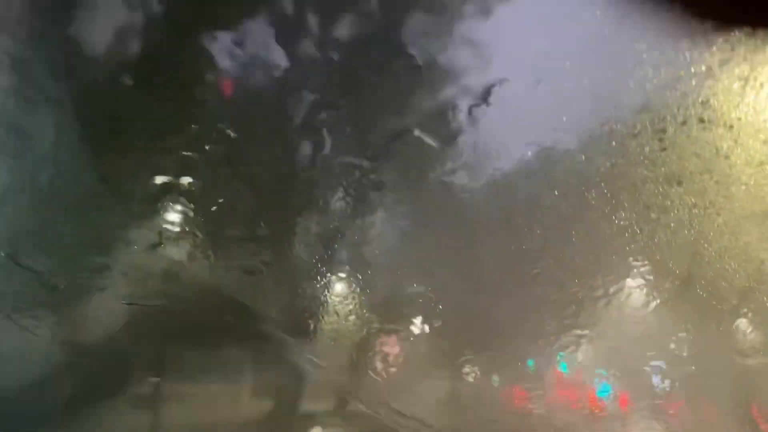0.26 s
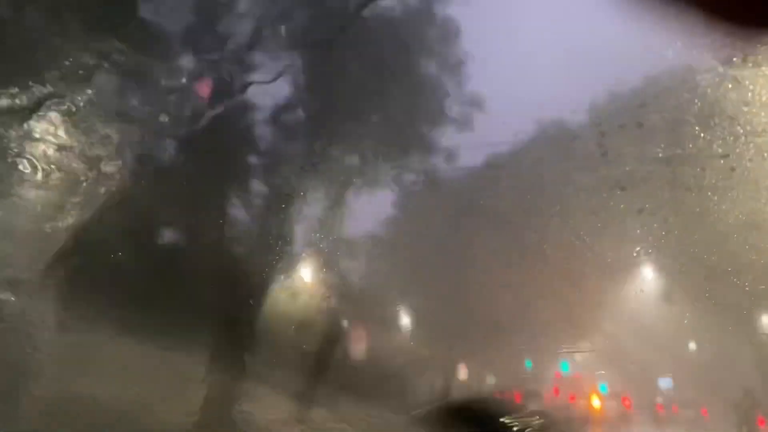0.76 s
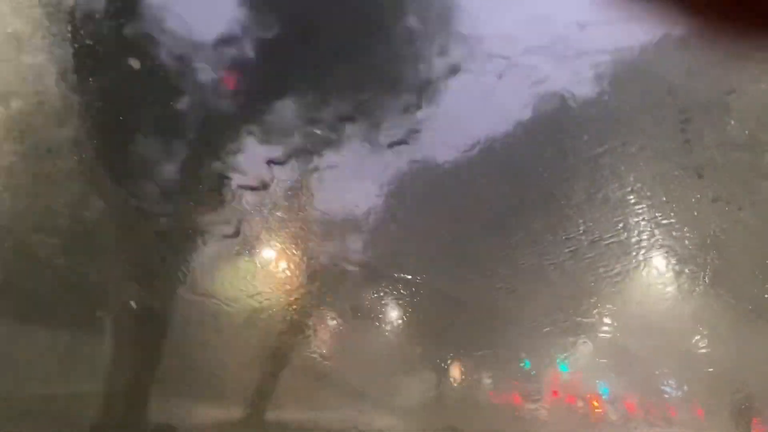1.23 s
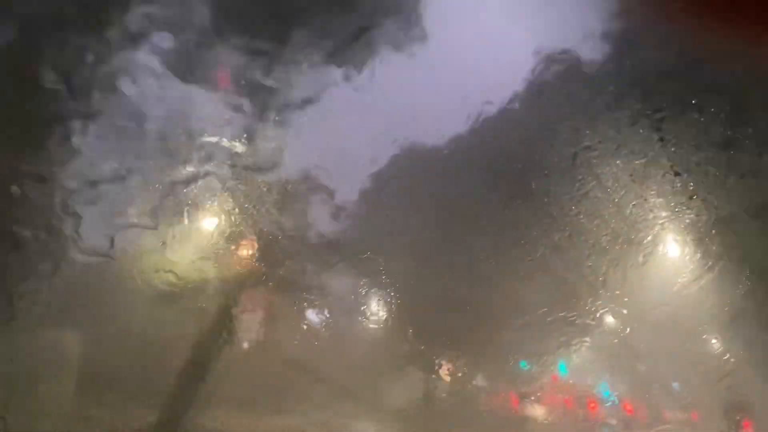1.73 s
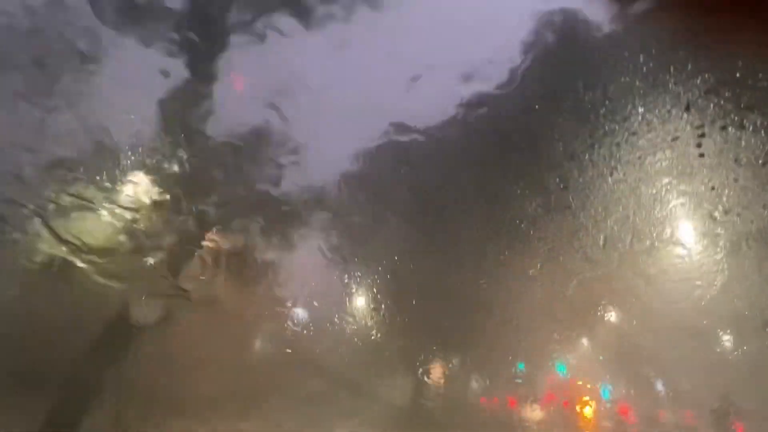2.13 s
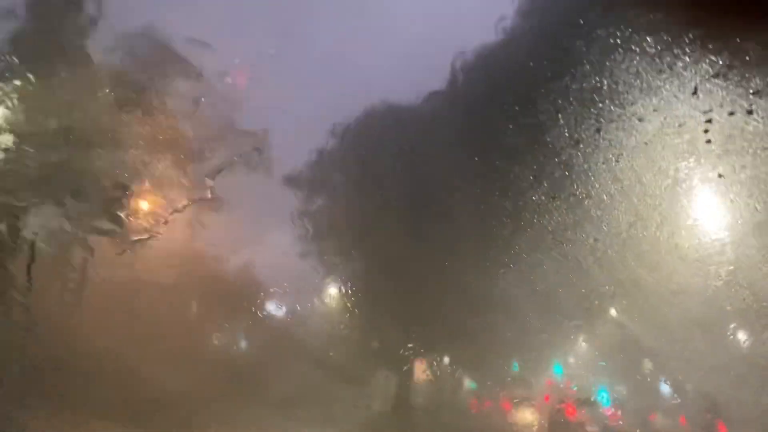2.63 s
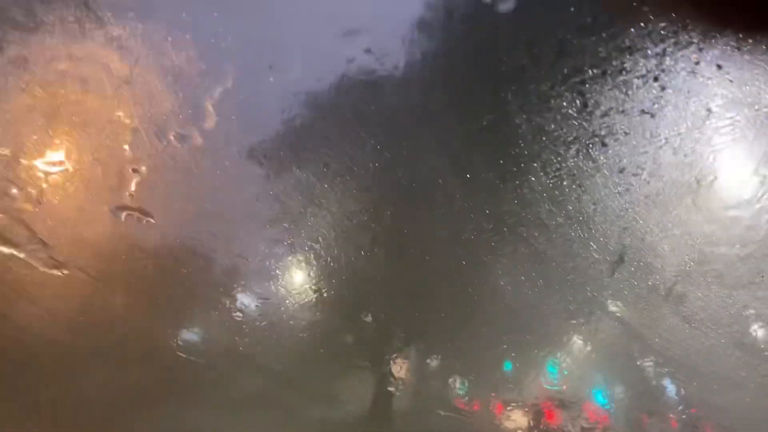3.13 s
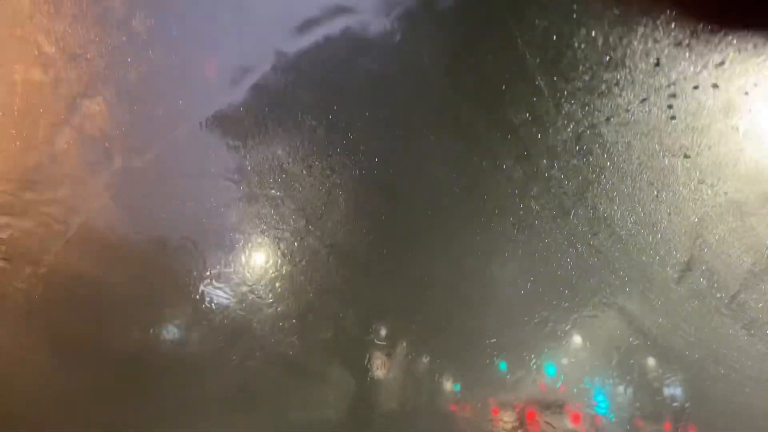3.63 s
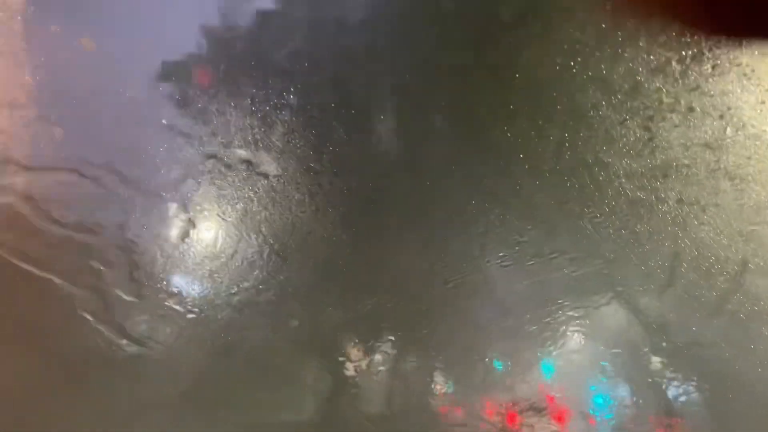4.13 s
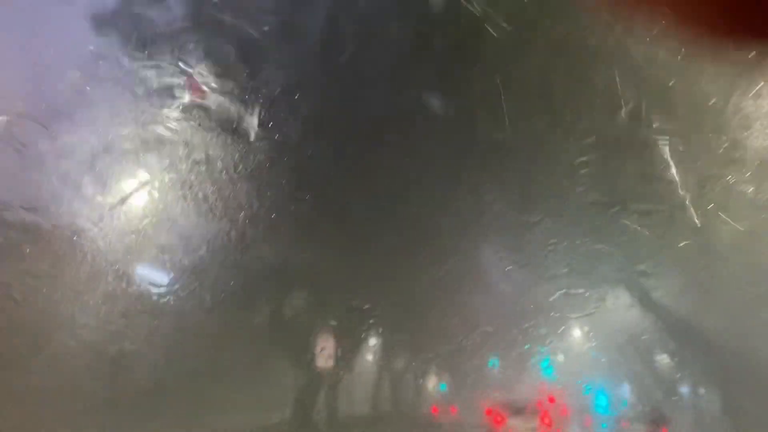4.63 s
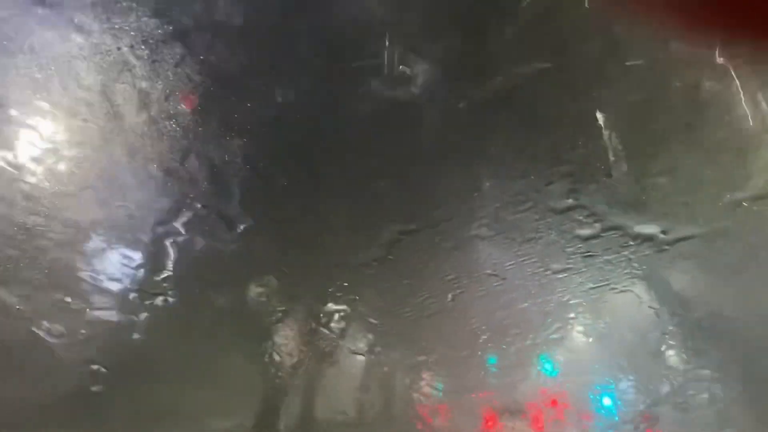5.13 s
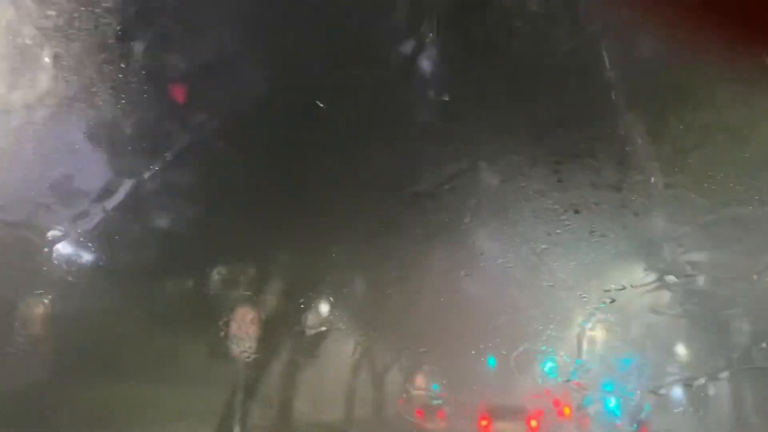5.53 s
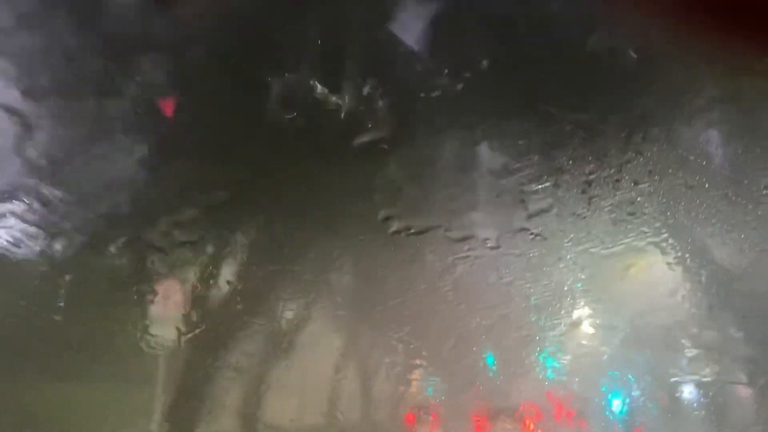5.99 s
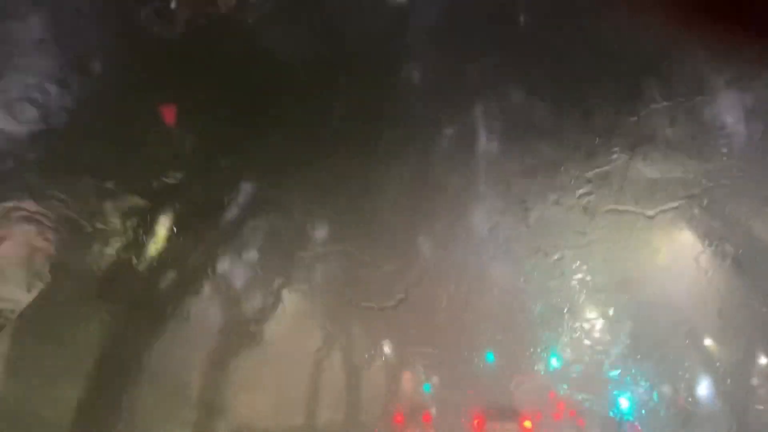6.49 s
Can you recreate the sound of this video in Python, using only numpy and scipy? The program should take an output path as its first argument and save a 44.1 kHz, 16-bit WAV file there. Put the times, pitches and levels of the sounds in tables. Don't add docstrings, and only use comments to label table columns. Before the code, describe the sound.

Rain gusts strongest in the first half second, then eases to a steady wash with scattered sharp splats. Big drops cluster early, thin out in the middle and return near five seconds. Wiper reversals beat regularly underneath, low bump then harder double thud. A low engine hum rises briefly, falls away, then lifts slightly near the end. Enclosed car cabin, wide stereo, microphone near the wet windshield.

```python
import sys
import numpy as np
from scipy import signal
from scipy.fft import rfft, irfft, next_fast_len
from scipy.io import wavfile
from scipy.ndimage import uniform_filter1d, map_coordinates

SR = 44100
rng = np.random.default_rng(int(sys.argv[2]) if len(sys.argv) > 2 else 0)


def wrap_up_sound(samples):
    columns = np.atleast_2d(samples).T
    tamed = np.clip(columns, -1, 1)
    steps = np.round(tamed * 32767).astype(np.int16)
    wavfile.write(sys.argv[1], SR, steps)


def volts(x):
    e = np.asarray(x, float) / 20
    return 10 ** e


N = 297802


def unit(x):
    return x / np.sqrt(np.mean(x ** 2) + 1e-20)


def along(points, hz):
    f, v = np.transpose(points)
    return np.interp(np.log(hz + 1), np.log(f + 1), v)


def curves(rows):
    s, *cols = np.transpose(rows)
    return [np.interp(np.arange(N) / SR, s, c) for c in cols]


def wobble(rate):
    knots = rng.standard_normal(int(N * 60 / SR) + 4)
    return map_coordinates(knots, [np.arange(N) * min(rate, 60) / SR])


def filtered(x, response):
    m = next_fast_len(x.shape[-1] + 2048)
    spectrum = rfft(x, m) * response(np.fft.rfftfreq(m, 1 / SR))
    return irfft(spectrum, m)[..., :x.shape[-1]]


# pitch_hz, likeness (1 = same)
LIKENESS = [(60, 1), (150, 0.94), (250, 0.8), (500, 0.5), (1200, 0.2), (3000, 0.35), (5500, 0.3),
            (7000, 0.45), (8300, 1), (15000, 1)]


def paired(hz):
    turn = np.arccos(np.clip(along(LIKENESS, hz), -1, 1)) / 2
    return np.array([np.cos(turn), np.sin(turn)])


def rush(spectrum, patchy_db):
    z = signal.stft(rng.standard_normal((2, N)), nperseg=256)[2]
    patches = uniform_filter1d(rng.standard_normal(z.shape[1:]), size=8, axis=0)
    patches = unit(uniform_filter1d(patches, size=8, axis=1))
    pair = signal.istft(z * volts(patchy_db * patches), nperseg=256)[1][:, :N]
    mid, side = filtered(pair, lambda hz: volts(along(spectrum, hz)) * paired(hz))
    return unit(np.array([mid + side, mid - side]))


# pitch_hz, level_db (per Hz)
SPRAY = [(4000, -24), (6500, -3.5), (9500, -0.5), (11000, -6), (12300, -16), (13100, -32), (14200, -26),
         (15600, -40)]


def splats(s, db, ring_hz, click_db, pan_db, t60):
    t = np.arange(768) / SR
    noise = rng.standard_normal((len(s), 2, 2, len(t)))
    noise[..., 0] += 6
    c = ring_hz[:, None, None]

    def panel(f):
        resonance = 1j * f * .9 * c / (c * c - f * f + 1j * f * 1.48 * c)
        return resonance / (1 + 1j * f / 7000) ** 2 / (1 + (f / 11000) ** 8)

    def bending(f):
        return np.exp(-1j * 25 * (np.sqrt(f / 1000) - f / 5000))

    def peak(x):
        return x / np.abs(x).max(axis=(1, 2), keepdims=True)

    ring = filtered(noise[:, 0] * volts(-60 * t / t60), lambda f: panel(f) * bending(f) * paired(f))
    click = filtered(noise[:, 1] * volts(-60 * t / 0.024), lambda f: volts(along(SPRAY, f)) * paired(f))
    drop = peak(ring) + volts(click_db)[:, None, None] * peak(click)
    drop = volts(db)[:, None, None] * drop
    at = (np.round(s * SR).astype(int)[:, None] + np.arange(len(t))).ravel()
    ports = [volts(k * pan_db / 2)[:, None] * (drop[:, 0] + k * drop[:, 1]) for k in (1, -1)]
    return np.array([np.bincount(at, p.ravel(), N + len(t))[:N] for p in ports])


# start_s, level_db
SHOWER = [(0, -31.5), (.06, -27), (.44, -25.5), (.57, -31.5), (1.28, -34.5), (1.36, -33.5), (2.05, -31.5),
          (2.68, -33), (2.9, -37.5), (3.22, -36.5), (3.33, -31.5), (4.5, -32), (4.95, -30.5), (5.27, -29),
          (5.36, -32.5), (5.8, -31), (6.32, -33.5), (6.55, -29.5)]
# pitch_hz, level_db (per Hz)
PATTER = [(250, -30), (500, 0), (800, 2), (1300, 2), (2000, -1), (3200, -2.5), (4500, -8.5), (6200, -15),
          (9000, -35)]
# pitch_hz, level_db (per Hz)
ROOF = [(100, -28), (180, -2), (300, -3.5), (450, -8), (700, -55)]
SPRAY_DB, SPRAY_GROWS = -11, 0.84
ROOF_DB, ROOF_GROWS = -32.5, 0.45


def rain_wash():
    patter_db, = curves(SHOWER)
    mean_db = patter_db.mean()
    swell_db = patter_db - mean_db
    gust_db = 0.5 * wobble(13) + 0.3 * wobble(25)
    spray_db = mean_db + SPRAY_DB + SPRAY_GROWS * swell_db + gust_db + 0.64 * wobble(5)
    roof_db = ROOF_DB + ROOF_GROWS * swell_db + 0.84 * wobble(12)
    wash = volts(patter_db + gust_db + 2.8) * rush(PATTER, patchy_db=2.0)
    wash += volts(spray_db) * rush(SPRAY, patchy_db=2.0)
    return wash + volts(roof_db) * rush(ROOF, patchy_db=2.5)


def near_drops():
    patter_db, = curves(SHOWER)
    luck = rng.random((1500, 5))
    s = luck[:, 0] * (N - 1) / SR
    size_db = patter_db[(s * SR).astype(int)] - 3.5 - 3.8 * np.log(luck[:, 1] + 0.017)
    ring_hz = 1200 * 3.5 ** luck[:, 2]
    click_db = -22 + 16 * luck[:, 3]
    pan_db = 8 * (luck[:, 4] - .5)
    return splats(s, size_db, ring_hz, click_db, pan_db, t60=0.014)


# start_s, firing_hz, load_db
ENGINE = [(0, 39.1, -22), (.15, 38.65, -17), (1.31, 38.6, -25), (2.16, 37.71, -24), (2.45, 37.6, -25),
          (2.57, 35.96, -18), (2.73, 39, -18.5), (2.82, 41.02, -16.5), (2.93, 30.62, -26.5),
          (3.44, 29.84, -21), (3.93, 25.99, -25), (4.25, 25.14, -26.5), (5.0, 24.01, -24.5),
          (6.0, 23.6, -25), (6.15, 30.34, -23), (6.26, 33.71, -20), (6.45, 30.2, -21), (6.75, 30.37, -20.5)]
# pitch_hz, level_db
CABIN = [(20, -22), (30, -5), (38, 0), (52, -1.5), (77, -7), (98, 0.5), (118, -4.5), (150, -1), (172, -11),
         (200, -27), (300, -24.5)]
DECLUTCH_S, DECLUTCH_DB = 2.56, -7


def engine():
    firing_hz, load_db = curves(ENGINE)
    turn = 2 * np.pi * np.cumsum(firing_hz) / SR
    loose_db = DECLUTCH_DB * np.clip((np.arange(N) / SR - DECLUTCH_S) / .08, 0, 1)
    drone = np.zeros(N)
    for k in range(1, 9):
        order_db = load_db + 2.5 + along(CABIN, k * firing_hz) + 1.2 * wobble(7)
        if k == 1:
            order_db = order_db + loose_db
        drone += volts(order_db) * np.cos(k * turn + 0.17 * k * wobble(6))
    return filtered(drone, lambda hz: [1 + .12j * hz / 150, 1 - .12j * hz / 150])


# pitch_hz, level_db (per Hz)
ROAD = [(15, -40), (28, -9), (40, 3), (60, 8.5), (100, 2), (150, -2.5), (190, -19), (300, -50)]
ROAD_DB, ROAD_DB_PER_HZ = -23.5, 0.4


def road_rumble():
    firing_hz = curves(ENGINE)[0]
    road_db = ROAD_DB + ROAD_DB_PER_HZ * (firing_hz - firing_hz.mean())
    return volts(road_db + 1.9 * wobble(8.0)) * rush(ROAD, patchy_db=2.66)


# start_s, peak_db, ring_hz
SPATTER = [(0.0952, -15, 1770), (0.2448, -11, 1540), (0.2843, -18, 3000), (0.4195, -11, 1430),
           (0.5924, -13.5, 1610), (0.7881, -16, 1520), (0.8044, -16.5, 2740), (1.0377, -15.5, 1420),
           (1.3012, -17, 1540), (1.5793, -24, 1830), (1.7928, -24, 1300), (2.1077, -15.5, 1530),
           (2.1885, -19, 2930), (2.2542, -14, 2960), (2.295, -14.5, 2820), (2.6744, -15.5, 1525),
           (2.809, -17, 1440), (3.2813, -23, 1520), (5.0686, -18, 1720), (5.1218, -11.5, 1497),
           (5.235, -12, 1392), (5.5373, -13.5, 1350), (5.679, -20, 1344), (5.737, -23, 2780),
           (5.9229, -16, 1632), (6.0372, -16, 1750), (6.1, -18, 1392), (6.4138, -15, 2687),
           (6.5946, -24, 3130), (6.6328, -17, 1731)]


def roof_edge_drops():
    s, size_db, ring_hz = np.transpose(SPATTER)
    return splats(s, size_db - 3.0, ring_hz, 0 * s - 18, 0 * s + 1.3, t60=0.043)


# start_s, peak_db
TICKS = [(0.1351, -26), (0.1815, -29), (0.2838, -22), (0.307, -23), (0.4759, -22), (0.5157, -22),
         (0.5931, -30), (0.6674, -27), (0.9024, -26), (1.0078, -20.5), (1.1004, -27), (1.3414, -25),
         (1.6741, -28), (1.8067, -33), (1.896, -43), (1.9933, -24), (2.038, -28), (2.1896, -27),
         (2.5464, -31), (2.674, -28), (3.9044, -26), (4.8953, -36), (4.9333, -26), (5.2793, -30),
         (5.3842, -25), (5.875, -33), (6.473, -28), (6.5927, -38), (6.6279, -26)]


def glass_ticks():
    s, tick_db = np.transpose(TICKS)
    return splats(s, tick_db, 0 * s + 5000, 0 * s + 7, 0 * s, t60=0.012)


def thuds(events, modes, swing_s, rise_s, tick_db):
    t = np.arange(SR // 3) / SR
    rise = (1 - np.exp(-t / rise_s)) ** 2

    def rubber(f):
        resonance = 1j * f * 1500 / (1200 ** 2 - f * f + 1j * f * 1500)
        return resonance / (1 + 1j * f / 5000) ** 2

    out = np.zeros((2, N + SR))
    for s, db in events:
        ring = np.zeros((2, len(t)))
        for hz, left_db, right_db, t60 in modes:
            mode_db = np.array([[left_db], [right_db]]) + rng.normal(0, 1.0) - 60 * t / t60
            ring += volts(mode_db) * np.cos(2 * np.pi * hz * (t - swing_s))
        tick = filtered(rng.standard_normal((2, len(t))) * rise * volts(-60 * t / 0.058), rubber)
        start = round((s - .002) * SR)
        out[:, start:][:, :len(t)] += volts(db) * (1.21 * rise * ring + volts(tick_db) * tick)
    return out[:, :N]


# start_s, level_db
SWING = [
    (.14, -33),
    (1.13, -11),
    (2.11, -10.5),
    (3.11, -9),
    (4.1, -10),
    (5.08, -14),
    (6.08, -8),
]
# pitch_hz, left_db, right_db, t60_s
PILLAR = [(62, 4, 1, 0.19), (97, -7.5, -8.5, 0.33), (260, -27, -33, .08)]


def pillar_thuds():
    return thuds(SWING, PILLAR, swing_s=0.0107, rise_s=0.0053, tick_db=-14)


# start_s, peak_db, ring_hz, pan_db
DROPS = [(0.1805, -7, 2770, -1), (0.308, -13, 1520, -2), (0.3409, -11.5, 1520, 7), (0.5155, -25, 1230, -5),
         (0.6723, -11, 3040, 0), (0.9007, -18.5, 1490, 6), (0.931, -14, 1600, 4), (1.0079, -16, 2310, -5),
         (1.05, -12, 1390, -2), (1.1007, -16, 2900, -3), (1.2082, -16, 1940, -1), (1.5184, -18.5, 1590, 1),
         (1.7515, -16.5, 3230, 2.5), (1.8879, -12, 1300, -1), (1.9919, -12.5, 3795, -5),
         (2.0393, -9.5, 1830, -3), (2.155, -18, 1310, -4), (2.5467, -14, 2563, 2), (2.6345, -13, 2210, -2),
         (2.7384, -13, 1390, 3), (4.8766, -15.5, 2730, -3), (4.8937, -9, 1875, 1), (4.978, -13, 1670, 0),
         (5.3837, -19, 1646, 3.0), (5.6969, -14.5, 2053, 3), (5.8023, -10.5, 1380, -3),
         (5.875, -12.5, 1587, -2), (6.4729, -12.5, 2420, -1), (6.6628, -13.5, 1778, 0),
         (6.7063, -14, 1380, -6)]


def big_drops():
    s, db, ring_hz, pan_db = np.transpose(DROPS)
    click_db = 0 * s - 20
    return splats(s, db - 1.5, ring_hz, click_db, pan_db + 0.5, t60=0.053)


# start_s, level_db
PARK = [
    (.618, -6.5),
    (1.606, -5),
    (2.5921, -5.5),
    (3.5831, -6),
    (4.5633, -6.5),
    (5.553, -6.5),
    (6.5413, -8),
]
# pitch_hz, left_db, right_db, t60_s
COWL = [(87.9, -15, -11, 0.39), (132.5, 2, 2.5, 0.1), (182.8, -12.5, -2.5, 0.084), (250, -2, -19.5, 0.093),
        (316, -14, -15, .15), (399, -15.5, -18.5, 0.16), (553, -14, -23, 0.12)]
# pitch_hz, left_db, right_db, t60_s
SECOND_BLADE = [(152, 4, 5.5, 0.061), (92, 1, -10, 0.046), (252, -19, -14, 0.078)]
SNAP_LEAD_S, SNAP_DB, SNAP_HZ = 0.00154, -8, 2800


def cowl_thuds():
    thud = thuds(PARK, COWL, swing_s=.0105, rise_s=0.0029, tick_db=5)
    second = np.add(PARK, [.026, 0])
    thud += thuds(second, SECOND_BLADE, swing_s=0.0057, rise_s=0.0044, tick_db=-12)
    s, db = np.transpose(PARK)
    snap = splats(s - SNAP_LEAD_S, db + SNAP_DB, 0 * s + SNAP_HZ, 0 * s - 30, 0 * s, t60=0.0065)
    return thud + snap


def scene():
    rain = rain_wash() + near_drops() + roof_edge_drops() + glass_ticks() + big_drops()
    wipers = pillar_thuds() + cowl_thuds()
    return rain + engine() + road_rumble() + wipers


def band_limit(x):
    return signal.sosfilt(signal.butter(12, 15750, fs=SR, output="sos"), x)


# pitch_hz, left_minus_right_db
LEAN = [(60, -1), (110, -1), (200, -2), (380, 0.0), (700, 0.5), (1290, 0), (2380, 2), (4400, 3),
        (8120, 1.5), (15000, -2)]
# pitch_hz, left_lead_rad
SKEW = [(150, -0.02), (340, -.3), (600, -1.4), (1200, -1.36), (2500, -0.31)]
PORT_LAG_S, LAG_FROM_HZ = .00027, 6600


def record(dry):
    def lag(hz):
        late = np.pi * PORT_LAG_S * np.maximum(hz - LAG_FROM_HZ, 0)
        return np.exp(-1j * late + .5j * along(SKEW, hz))

    def port_response(hz):
        lean_db = along(LEAN, hz) / 2
        band = hz < 15750
        return band * np.array([volts(lean_db) * lag(hz), volts(-lean_db) / lag(hz)])

    ports = filtered(dry, port_response)
    ports = ports / (1 + np.abs(ports / .95) ** 6) ** (1 / 6)
    return band_limit(ports)


dry = scene()
out = record(dry)
wrap_up_sound(out)
```